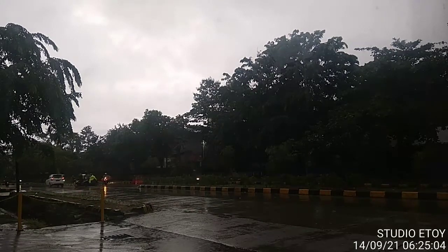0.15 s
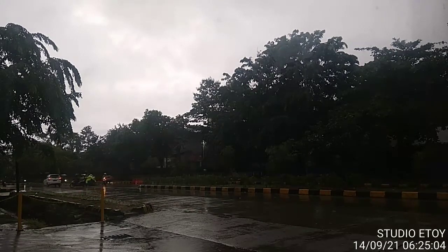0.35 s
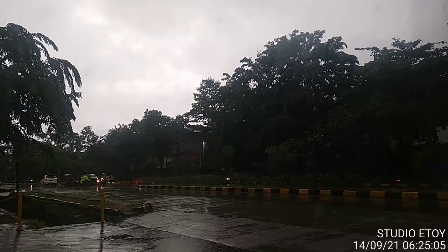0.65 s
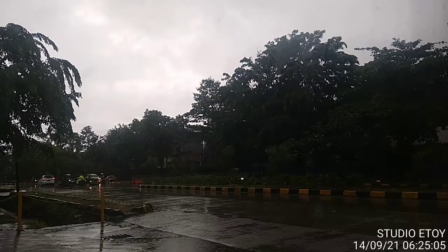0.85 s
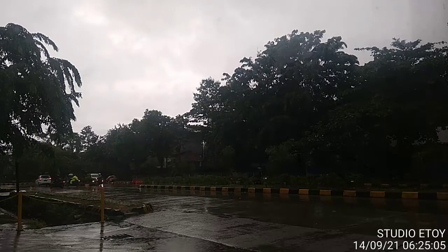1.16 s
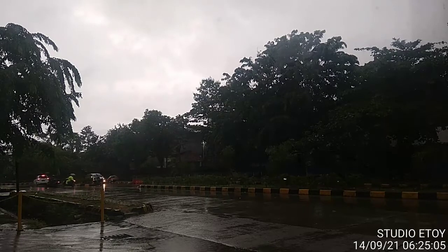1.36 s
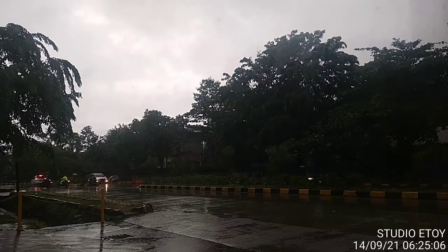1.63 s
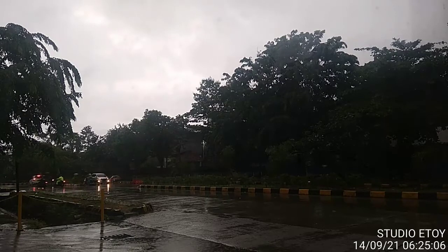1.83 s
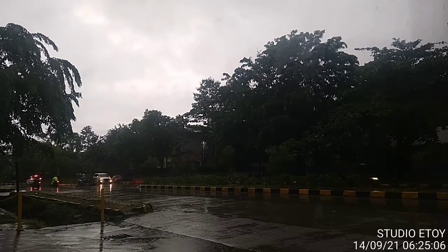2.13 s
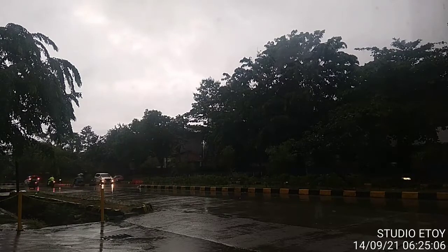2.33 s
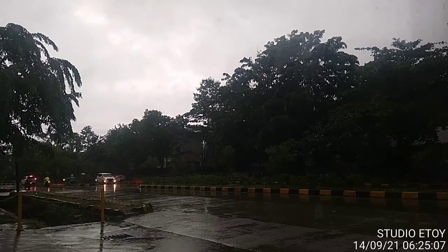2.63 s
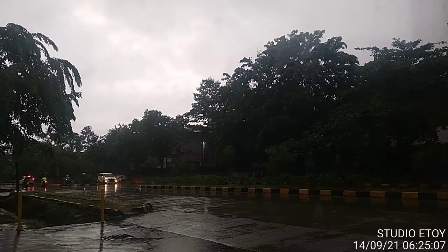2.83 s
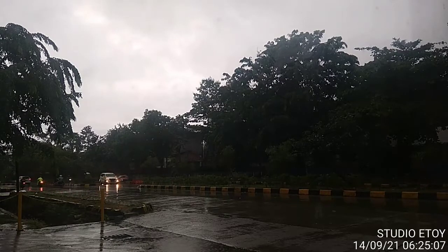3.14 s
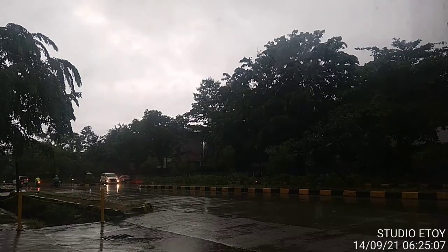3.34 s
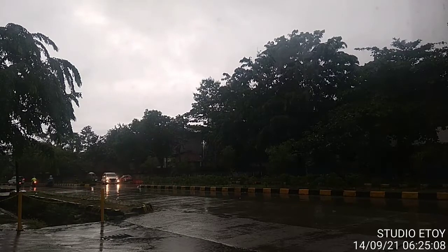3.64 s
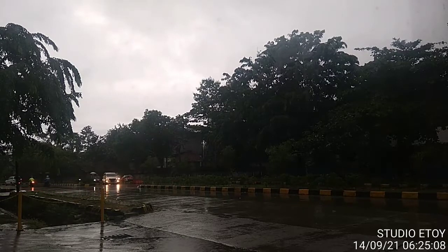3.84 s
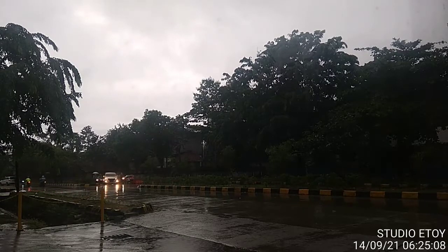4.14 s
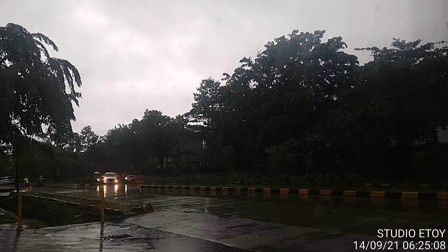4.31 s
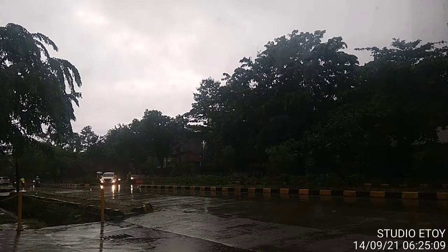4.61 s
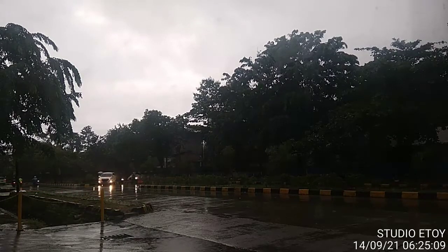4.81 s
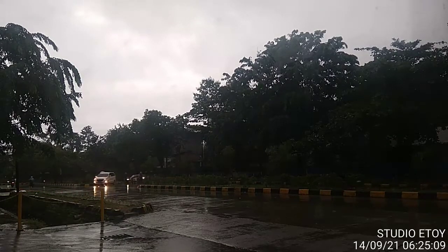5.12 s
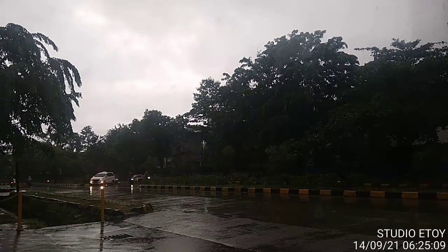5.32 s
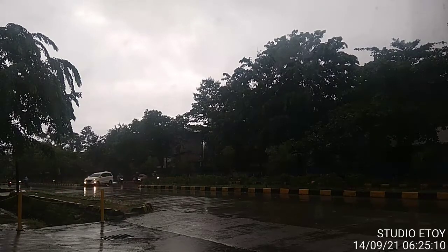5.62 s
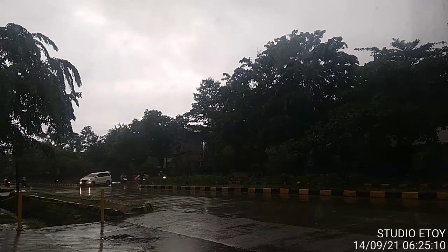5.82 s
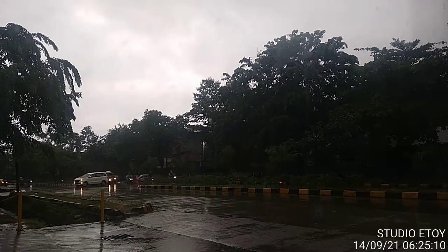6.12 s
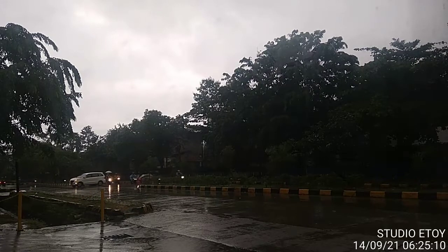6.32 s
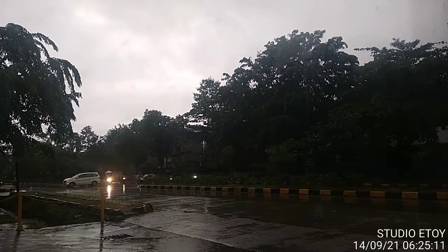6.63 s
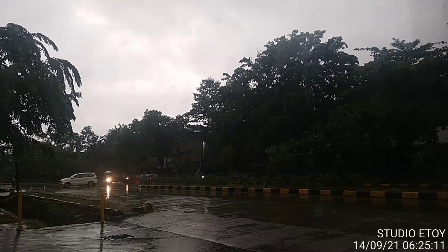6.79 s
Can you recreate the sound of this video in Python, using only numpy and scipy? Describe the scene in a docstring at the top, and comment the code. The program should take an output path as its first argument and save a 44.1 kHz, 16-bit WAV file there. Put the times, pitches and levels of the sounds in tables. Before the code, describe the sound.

Under a hard-walled shelter on a rainy street, soft thuds and dripping surround a cup's bright clinks and one strong wooden knock.

```python
"""Throughout, traffic rumbles and a thin wash of rain hisses (shaped noise) outside a hard-walled shelter.
From the first moments, drops plink, bits of metal tinkle and feet thud: short dying modes, through to the end.
Near 2 s a cup is set down with a faint knock, and about half a second later it is tapped at the rim.
Past 4 s a wooden table is knocked hard, then twice faintly; cup and table are banks of struck modes.
The walls throw back cup, table, plinks, tinkles and drops as a decaying noise tail."""
import sys
import numpy as np
from scipy import signal
from scipy.fft import rfft, irfft
from scipy.io import wavfile
from scipy.ndimage import uniform_filter1d

SR = 44100
rng = np.random.default_rng(int(sys.argv[2]) if len(sys.argv) > 2 else 0)


def to_wav(s):
    """Save 16-bit WAV."""
    ch = np.atleast_2d(s).T  # columns
    pcm = np.round(np.clip(ch, -1, 1) * 32767)  # PCM
    wavfile.write(sys.argv[1], SR, pcm.astype(np.int16))


N = 306936  # length [samples]


def gain_of(db):
    """Decibels to an amplitude factor."""
    return 10 ** (np.asarray(db) / 20)


def evened(x):
    """Scales a signal to an RMS of 1."""
    return x / np.sqrt(np.mean(x ** 2) + 1e-20)


def read(points, hz):
    """Reads a curve between its points, along log frequency."""
    point_hz, value = np.transpose(points)
    return np.interp(np.log(hz + 1), np.log(point_hz + 1), value)


def add(mix, start_s, sound, pan_db):
    """Mixes a sound in at start_s, with left louder than right by pan_db."""
    part = mix[:, round(start_s * SR):][:, :len(sound)]
    part += gain_of([[pan_db / 2], [-pan_db / 2]]) * sound[:part.shape[1]]


def ring(hz, db, t60, rise=0.0019):
    """A struck body: a sum of exponentially dying sine modes with a soft onset, peak 1."""
    t = np.arange(SR // 2)[:, None] / SR
    decay = gain_of(db - 60 * t / np.maximum(t60, .005))
    x = (decay * np.sin(2 * np.pi * hz * t)).sum(1)
    x *= (1 - np.exp(-2 * t[:, 0] / rise)) ** 2
    return x / abs(x).max()


def chatter(length_s, tick):
    """A contact that lands as one tick and then rattles as a noise burst; energy 1."""
    t = np.arange(SR // 10) / SR
    x = rng.standard_normal(len(t)) * np.sin(np.pi * np.clip(t / length_s, 0, 1))
    x /= np.linalg.norm(x) + 1e-12
    x[0] = tick
    return x / np.linalg.norm(x)


# Stereo width of diffuse sound: (frequency [Hz], left-right likeness [0 to 1])
LIKENESS = [(60, 1), (130, 0.99), (290, 0.92), (640, 0.3), (1410, 0.1), (3100, 0.2), (6820, 0), (15000, 0)]


def pair(hz, frames):
    """Diffuse sound: two random short-time spectra, alike in the bass and independent in the treble."""
    a, b, c, d = rng.standard_normal((frames, len(hz), 4)).T
    same = np.clip(read(LIKENESS, hz), -1, 1)[:, None]
    left = a + 1j * b
    right = same * left + np.sqrt(1 - same ** 2) * (c + 1j * d)
    return np.array([left, right])


# Tone of the street, before each band is levelled: (frequency [Hz], relative level [dB])
STREET_TONE = [(12, -46.5), (20, -14), (43, -5), (81, 5.5), (198, -19.5), (228, -25.5), (422, -26.5),
               (558, -31.5), (759, -32.5), (923, -36.5), (1120, -35.5), (5680, -46), (10200, -42.5),
               (14700, -51), (16000, -56)]
# Side the street leans to: (frequency [Hz], left minus right [dB])
STREET_LEAN = [(60, 10.5), (110, 3), (200, 7), (380, 2.5), (700, 3.5), (1290, 4.5), (2380, 7), (4400, 4),
               (8120, 8.5), (15000, 0.5)]
# Swells of the street: (time [s], level of rumble under 180 Hz [dB], level of rain wash above it [dB])
STREET_SWELL = [(0.0, -52, -58.5), (0.7, -55.5, -58), (1.3, -54.5, -58.5), (1.9, -52, -59),
                (2.6, -55, -58.5), (3.7, -51, -58.5), (4.05, -47, -59.5), (4.7, -53, -58),
                (5.199, -47.5, -59.5), (5.5, -52.5, -58.5), (5.8, -46.5, -60.5), (6.05, -55, -58.5),
                (6.6, -49, -59.5), (6.96, -53, -56.5)]


def street():
    """Rumble and rain wash: shaped noise with drifting patches of tone and a flicker across all pitches."""
    frames, hz = N // 256 + 5, np.fft.rfftfreq(1024, 1 / SR)
    time_s, rumble_db, wash_db = np.transpose(STREET_SWELL)
    low = 1 / (1 + (hz[:, None] / 180) ** 4)
    patches = uniform_filter1d(rng.standard_normal((frames, 513)), size=10, axis=0)  # smooth in time
    patches = evened(uniform_filter1d(patches, size=8, axis=1)).T  # smooth in pitch
    flicker = evened(uniform_filter1d(rng.standard_normal(frames), size=6))
    tone_db = read(STREET_TONE, hz)[:, None] + 1.3 * patches + .7 * flicker
    spectra = pair(hz, frames) * gain_of(tone_db)
    spectra *= gain_of(np.array([[.5], [-.5]]) * read(STREET_LEAN, hz))[:, :, None]
    out = 0
    for share, level_db in ((low, rumble_db), (1 - low, wash_db)):
        x = signal.istft(spectra * share, nperseg=1024, noverlap=768)[1][:, :N]
        swell = gain_of(np.interp(np.arange(N) / SR, time_s, level_db))
        out = out + x / np.std(x.mean(0)) * swell
    return out


# Decay of the shelter: (frequency [Hz], t60 [s])
WALL_DECAY = [(80, 0.56), (250, 0.31), (700, 0.22), (2000, 0.31), (6000, 0.31), (14000, 0.22)]


def walls(x):
    """Reflections build up over the first moments, then each band dies at its own speed."""
    hz, t = np.fft.rfftfreq(256, 1 / SR), np.arange(420) * 64 / SR
    decay = gain_of(-60 * t / read(WALL_DECAY, hz)[:, None])
    spectra = pair(hz, len(t)) * decay * (1 - np.exp(-t / 0.0024))
    tail = signal.istft(spectra, nperseg=256, noverlap=192)[1]
    tone = rfft(tail, axis=1)
    tone /= np.sqrt(uniform_filter1d(abs(tone) ** 2, size=19, axis=1))  # the walls favour no broad band
    fade = np.cos(np.linspace(0, np.pi / 2, SR // 2))
    tail = irfft(tone, axis=1)[:, :SR // 2] * fade
    return signal.oaconvolve(x, tail, axes=1)[:, :N]


def drops():
    """Many small drops at random moments, each a brief ring at one of 50 pitches; a few are large."""
    out = np.zeros((2, N))
    t = np.arange(2000) / SR
    for hz in np.geomspace(450, 13000, num=50):
        size = gain_of(4.53 * np.minimum(rng.exponential(1, (2, N)), 3.5))
        size *= rng.random((2, N)) < 5. / SR  # five drops a second at each pitch and side
        envelope = (1 - np.exp(-t / 0.004)) * gain_of(-60 * t / 0.03)
        plink = envelope * np.sin(2 * np.pi * hz * rng.uniform(0.89, 0.95) * t)
        out += signal.oaconvolve(size, plink[None])[:, :N] * (hz / 2000) ** -.1
    return gain_of([[-62], [-68]]) * out


# Drops on small hollow things: (time [s], relative level [dB], pitch [Hz], left minus right [dB])
PLINK_HITS = [(0.268, -53, 895, 16), (0.38, -45, 1910, 0), (0.445, -57, 5820, 11), (0.467, -56, 2400, 13),
              (0.505, -59, 4210, 8), (0.974, -54, 624, 5), (1.003, -53.5, 1720, 14), (1.024, -57, 1150, 14),
              (1.03, -58, 5900, 7), (1.038, -53.5, 1820, 13), (1.094, -55.5, 3230, 12),
              (1.686, -55, 2470, 7), (1.889, -54, 797, 7), (1.947, -47.5, 8320, -9),
              (2.232, -56.5, 2460, 6), (2.258, -59, 1900, -11), (2.448, -53.5, 2480, 13),
              (2.455, -50.5, 2967, 6), (3.004, -54, 2460, 5), (3.417, -57, 2930, 4),
              (3.45, -56, 1705, 19.5), (3.46, -59.5, 4160, 10), (3.65, -48.5, 3760, 9),
              (3.673, -53.5, 2760, 14), (3.725, -59, 4870, 9), (3.946, -56.5, 1570, 14.5),
              (4.734, -51.5, 750, 12), (4.945, -58.5, 1610, 8), (4.958, -58.5, 4070, 12),
              (4.98, -58, 3150, 9), (4.985, -54, 630, 5), (5.28, -55.5, 618, 5), (5.36, -59.5, 2450, 2),
              (5.379, -59, 3160, -2), (5.63, -60.5, 1666, 6), (5.904, -56, 1630, 11), (6.08, -57.5, 740, 2),
              (6.676, -58.5, 1260, 12), (6.715, -62, 1340, 8), (6.77, -56.5, 735, 9),
              (6.875, -58.5, 1610, 6), (6.926, -57.5, 1103, 11)]
# Bits of metal: (time [s], relative level [dB], centre pitch [Hz], rattle before 0.01 s is added [s])
TINKLE_HITS = [(0.416, -51, 10190, 0.016), (0.724, -49, 9160, 0.0049), (1.013, -53, 8520, 0.012),
               (1.7555, -45.5, 8960, 0.049), (1.8287, -52, 8400, 0.015), (2.1753, -44, 11800, 0.013),
               (3.001, -56.5, 11600, 0.011), (3.057, -54.5, 14000, 0.049), (3.1577, -58, 8850, 0.014),
               (3.4083, -51, 10360, 0.045), (3.432, -50, 10200, 0.035), (3.5593, -56, 13050, 0.0079),
               (3.6578, -54, 9900, 0.062), (3.7277, -49.5, 9450, 0.028), (4.5984, -54, 10080, 0.031),
               (4.789, -58.5, 8680, 0.0054), (5.4786, -56.5, 9240, 0.038), (5.5687, -57, 10450, 0.013),
               (6.2951, -56, 9790, 0.031), (6.8667, -60, 9700, 0.031)]
PLINK_T60_S, PLINK_DAMPING = 0.052, .55  # t60 at 1 kHz; it shortens with pitch to this power
TINKLE_OCTAVES, TINKLE_PAN_DB = .32, 7  # spread of the thin modes; left minus right


def small_things():
    """Plinks are one mode with a gritty start; tinkles ring at one pitch and rattle thin modes about it."""
    out = np.zeros((2, N))
    for time_s, db, hz, pan_db in PLINK_HITS:
        t60 = PLINK_T60_S * (1000 / hz) ** PLINK_DAMPING
        contact = chatter(.022, .5)
        body = ring(np.array([hz]), 0, t60, rise=0.0015)
        add(out, time_s - .004, gain_of(db) * signal.fftconvolve(body, contact), pan_db)
    chance = rng.standard_normal((len(TINKLE_HITS), 2, 12))
    for (time_s, db, hz, rattle_s), (away, size) in zip(TINKLE_HITS, chance):
        thin_hz = np.clip(hz * 2 ** (TINKLE_OCTAVES * (away - .1)), 1500, 15500)
        cluster = ring(thin_hz, 1.1 * size, .025)
        splash = ring(thin_hz * 2 ** (0.4 * size), 0, .003, rise=.0001)  # wide and short
        body = ring(np.array([hz]), 0, 0.021) + gain_of(3) * (cluster + 0.65 * splash)
        contact = chatter(rattle_s + .01, .2)
        add(out, time_s, gain_of(db) * signal.fftconvolve(body, contact), TINKLE_PAN_DB)
    return out


# Footfalls: (time [s], level [dB], floor pitch [Hz])
FOOTFALLS = [(0.404, -39.5, 78.7), (0.562, -30, 87.6), (0.7, -38.5, 82.7), (1.283, -43.5, 72.4),
             (2.884, -44, 77), (3.873, -34, 77), (3.926, -31.5, 78), (4.117, -30.5, 95.2),
             (4.718, -31.5, 82.6), (4.79, -36.5, 102.3), (5.575, -27, 73.8), (5.6, -30.5, 82.7),
             (5.791, -46, 81), (5.843, -38.5, 85.3), (5.951, -36.5, 71.6), (6.247, -39, 90),
             (6.81, -42, 82.3)]
THUD_T60_S, THUD_DAMPING = 0.24, 2.4  # t60 at 80 Hz; it shortens with pitch to this power


def floor():
    """Each footfall rings the floor at a low pitch and a weaker one above it."""
    out = np.zeros((2, N))
    for time_s, db, hz in FOOTFALLS:
        t60 = THUD_T60_S * (80 / hz) ** THUD_DAMPING
        thud = ring(hz * np.array([1, 1.45]), np.array([0, -9.]), t60, rise=0.013)
        add(out, time_s, gain_of(db) * thud, 5.5)
    return out


# Modes of the cup: (pitch [Hz], t60 [s], level when set down [dB], level when tapped at the rim [dB])
CUP_MODES = [(1189, 0.088, 0.5, -5.5), (1879, 0.061, -58.5, -25), (2468, 0.093, -10.5, -5.5),
             (3566, 0.12, -11.5, -45), (4167, 0.065, -10, -5), (4570, 0.045, -63, -13.5),
             (6245, 0.032, -10, 2.5), (6387, 0.1, 0, -8), (7240, 0.055, -16.5, -2.5),
             (7920, 0.044, -55, -6), (8680, 0.07, -18.5, 2), (8490, 0.102, -40, -2), (9080, 0.13, 1, -1),
             (10140, 0.07, -33, -8), (9850, 0.15, -10, -25), (9760, 0.07, -23.5, -7),
             (10600, 0.061, -9, -2), (11400, 0.077, -16, -14), (11720, 0.0653, -29, -3),
             (11400, 0.07, -13, -9), (12030, 0.032, -10, 2), (12247, 0.07, -46.5, -15),
             (12516, 0.0527, -41, -4), (12720, 0.086, -10, -10), (12800, 0.07, -44, -4),
             (13840, 0.15, -8, -2), (14686, 0.077, -21, 2), (15250, 0.063, -10, -5)]
# Set down, then tapped: (time [s], relative level [dB], clack [dB], rattle [s],
# first tick against the rattle [ratio], left minus right [dB])
CUP_CLINKS = [(1.976, -14.5, -3, 0.03, 0.62, 9.5), (2.526, -24, 4.5, 0.031, 0.4, 8)]


def cup():
    """Where the cup is struck sets how strongly each mode rings; while touched it is damped and clacks."""
    out = np.zeros((2, N))
    hz, t60, base_db, rim_db = np.transpose(CUP_MODES)
    for clink, mode_db in zip(CUP_CLINKS, (base_db, rim_db)):
        time_s, db, clack_db, rattle_s, tick, pan_db = clink
        clack = ring(hz, mode_db, .015)
        body = ring(hz, mode_db, t60) + gain_of(clack_db) * clack
        add(out, time_s, gain_of(db) * signal.fftconvolve(body, chatter(rattle_s, tick)), pan_db)
    return out


# Modes of the table top: (pitch [Hz], relative level [dB], t60 before damping [s])
TABLE_MODES = [(122, -3, 0.22), (149, -3, 0.16), (211.6, -5.5, 0.099), (245.7, 1, 0.09),
               (342.5, -9.5, 0.16), (360.6, -9, 0.14), (453, -12, 0.073), (617.3, -7, 0.16),
               (632, -14.5, 0.2), (737, -12, 0.067), (884, -19, 0.12), (1018, -26, 0.046),
               (1257, -22, 0.11), (1480, -37, 0.09), (1758, -32.5, 0.059), (2000, -19.5, 0.049)]
# Knocks: (time [s], relative level [dB], lowest pitch well driven [Hz], upper modes [dB],
# damping of low and middle t60 [factor], also of the top, dull thump [dB])
TABLE_KNOCKS = [(1.967, -37, 252, 1.5, 0.3, 8.5), (4.168, -6.5, 60, -5, 0.85, 0.5),
                (4.408, -30, 334, -7, 0.45, -29), (4.439, -38.5, 324, -3.5, 0.64, -16)]


def table():
    """A light blow hardly moves the low modes; upper modes sit further right, the highest a moment late."""
    out = np.zeros((2, N))
    hz, mode_db, t60 = np.transpose(TABLE_MODES)
    low, top = hz < 420, hz > 1100
    middle = ~low & ~top
    for time_s, db, low_hz, upper_db, damp, thump_db in TABLE_KNOCKS:
        reach_db = mode_db - 20 * np.log10(1 + (low_hz / hz) ** 3)
        thump = ring(hz[~top], reach_db[~top], 0.026, rise=0.0023)
        lows = ring(hz[low], reach_db[low], damp * t60[low], rise=0.0047)
        middles = ring(hz[middle], reach_db[middle], damp * t60[middle], rise=0.0069)
        tops = ring(hz[top], reach_db[top], damp * t60[top], rise=0.004)
        add(out, time_s, gain_of(db + thump_db) * thump, 5.)
        add(out, time_s, gain_of(db) * lows, 5.5)
        add(out, time_s, gain_of(db + upper_db) * middles, -3.)
        add(out, time_s + .008, gain_of(db + upper_db - 19) * tops, 1.5)
    # a small top sends out no deep bass
    return signal.sosfilt(signal.butter(2, 75, "high", fs=SR, output="sos"), out)


def scene():
    """Balances the direct sounds with what the walls throw back."""
    near, small, patter = cup() + table(), small_things(), drops()
    echoes = walls(near + gain_of(2.0) * small + gain_of(-4) * patter)
    direct = gain_of(-8.5) * near + gain_of(2.5) * small + patter
    return direct + echoes + floor() + street()


EDGE_HZ = 15600


def record(dry):
    """A steep low-pass takes off the highest treble."""
    low_pass = signal.firwin(511, EDGE_HZ, window=("kaiser", 9), fs=SR)
    return signal.oaconvolve(dry, low_pass[None], "same")


dry = scene()
out = record(dry)
to_wav(out)
```